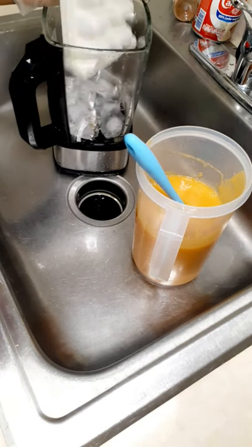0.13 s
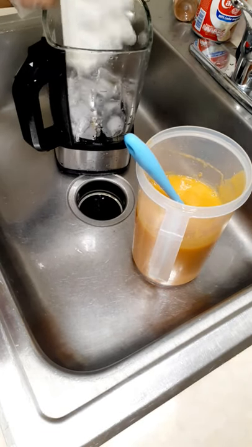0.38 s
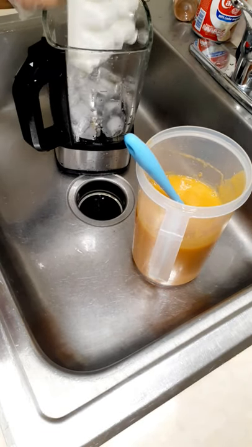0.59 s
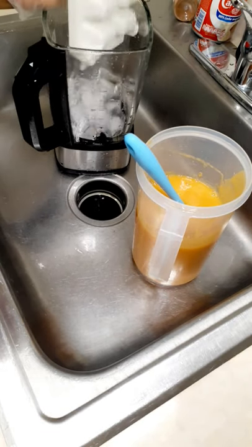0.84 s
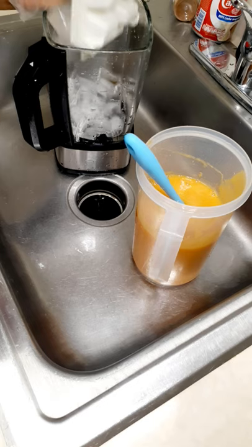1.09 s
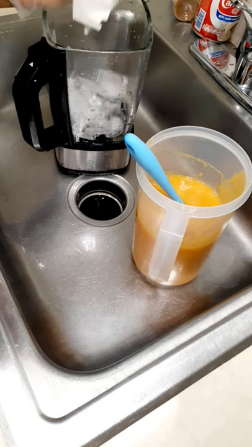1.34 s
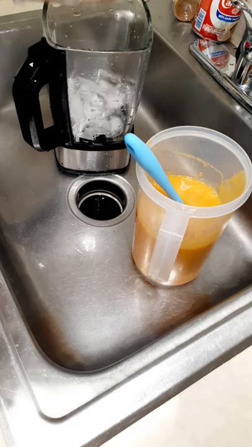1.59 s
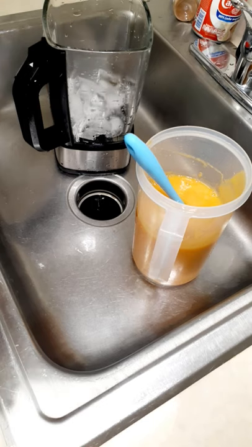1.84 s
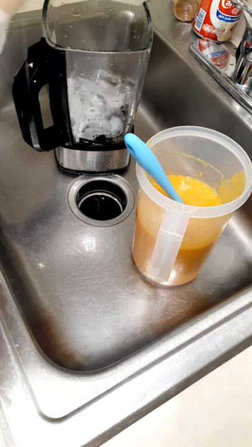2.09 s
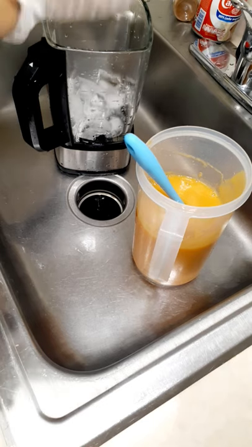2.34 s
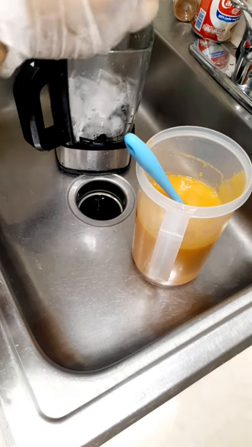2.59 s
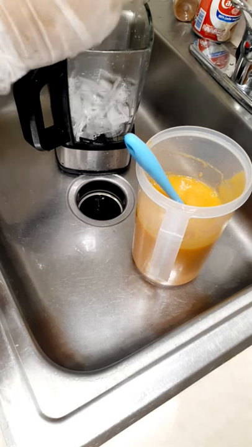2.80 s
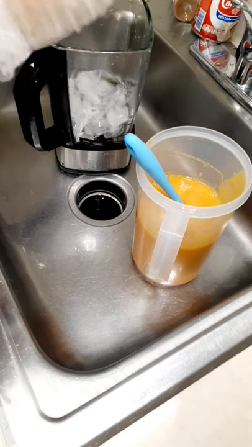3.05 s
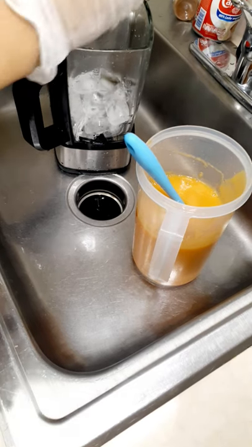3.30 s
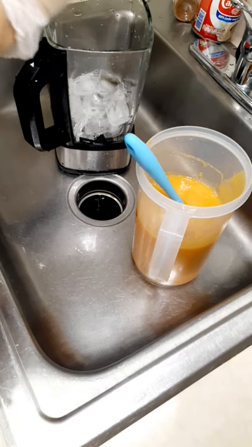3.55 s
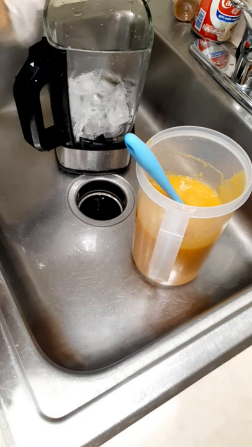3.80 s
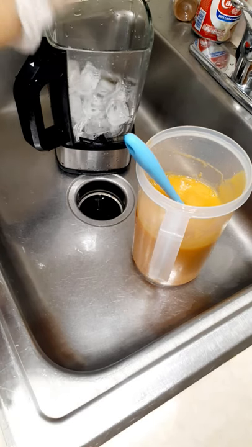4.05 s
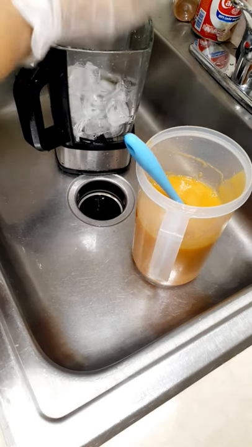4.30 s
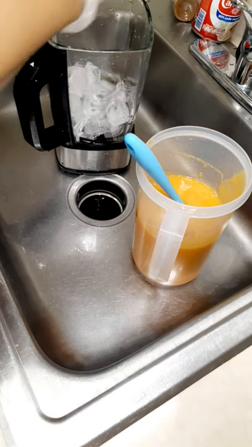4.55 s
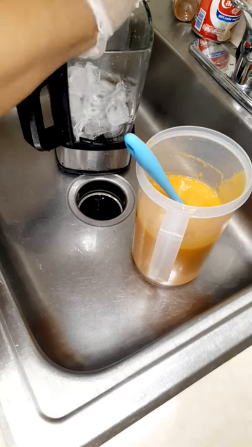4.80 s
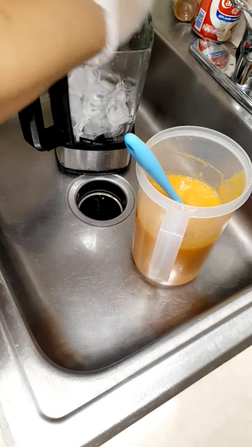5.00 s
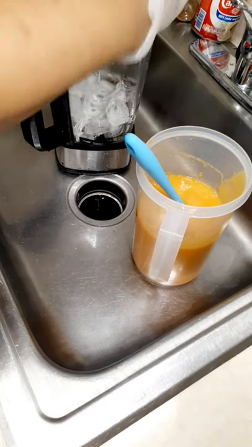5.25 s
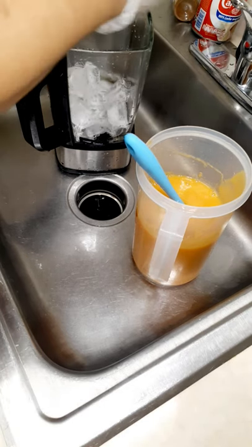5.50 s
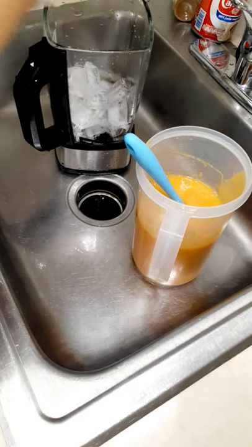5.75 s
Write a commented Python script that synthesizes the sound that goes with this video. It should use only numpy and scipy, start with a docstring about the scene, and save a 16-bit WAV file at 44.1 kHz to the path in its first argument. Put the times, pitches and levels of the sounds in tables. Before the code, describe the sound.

Close stereo capture in a home kitchen: ice cubes pour into a heavy glass jar standing in a steel sink, a dense clatter for about a second. Gloved hands then rustle and drop smaller batches, with gaps of soft shuffling, ending in two loud isolated cracks and near silence.

```python
"""Gloves rustle and ice shuffles; cubes are tipped from a tray, then dropped by a gloved hand, into a thick glass jar
standing in a steel sink. Each landing is a clack: noise chatter in a short resonance, with bright splintering. Damped
sines ring the glass and thump the basin, noise tails scatter into the kitchen and the heap settles in grains. Between
landings hands stir the ice in swells, down to a faint stillness. Two microphones a hand apart, the left one nearer."""
import sys
import numpy as np
from scipy import signal
from scipy.fft import rfft, irfft
from scipy.io import wavfile

SR = 44100
rng = np.random.default_rng(int(sys.argv[2]) if len(sys.argv) > 2 else 0)


def generate_wav(signal):
    """Clip the signal to [-1, 1] and save it as 16-bit WAV at the path in sys.argv[1]."""
    frames = np.transpose(np.atleast_2d(signal))
    scaled = np.clip(frames, -1, 1) * 32767
    pcm = np.round(scaled).astype(np.int16)
    wavfile.write(sys.argv[1], SR, pcm)


N = 259308   # samples in the scene


def from_db(db):
    """Level definition: 20 dB per factor of ten in amplitude."""
    return 10 ** (np.asarray(db) / 20)


def rms_one(x):
    """Energy normalisation: scales x to a root mean square of 1."""
    return x / np.sqrt(np.mean(x ** 2) + 1e-20)


def at_hz(points, hz, column):
    """Logarithmic pitch scale: reads a table column on a log-frequency axis."""
    points = np.array(points)
    return np.interp(np.log(hz), np.log(points[:, 0]), points[:, column])


def coloured(x, spectrum):
    """Spectral shaping: weights x by the spectrum, silent outside it, at rms 1."""
    hz = np.maximum(np.fft.rfftfreq(N, 1 / SR), 1)
    inside = (hz >= spectrum[0][0]) & (hz <= spectrum[-1][0])
    gain = from_db(at_hz(spectrum, hz, column=1)) * inside
    return rms_one(irfft(rfft(x) * gain, N))


def ring(clicks, hz, t60):
    """Damped resonance: a unit click starts a sine of height 1 that loses 60 dB in t60 seconds."""
    radius = from_db(-60 / (t60 * SR))
    w = 2 * np.pi * hz / SR
    return signal.lfilter([0, np.sin(w)], [1, -2 * radius * np.cos(w), radius * radius], clicks + 1e-18)


def struck(events, blow_db, hz, t60, spread_db):
    """Modal excitation: every event strikes one mode with a strength of its own."""
    clicks = np.zeros(N)
    strengths_db = blow_db + spread_db * rng.standard_normal(len(events))
    clicks[(np.array(events)[:, 0] * SR).astype(int)] = from_db(strengths_db)
    return ring(clicks, hz, t60)


RIGHT_LAG_S = 0.0002598


def microphones(x):
    """Interaural-style delay: the direct path reaches the right side later."""
    return np.array([x, np.roll(x, round(RIGHT_LAG_S * SR))])


def grains(spectrum, per_s, spread_db, alike):
    """Poisson-like impacts: random tiny clicks over a smooth bed, partly shared by the two sides."""
    happens = rng.random((3, N)) < per_s / SR
    sizes = from_db(spread_db * np.minimum(rng.exponential(1, (3, N)), 3)) * happens
    noise = rng.standard_normal((3, N)) * (0.47 + sizes)
    shared, left, right = [coloured(row, spectrum) for row in noise]
    alike = np.clip(alike, 0, 1)
    return np.sqrt(alike) * microphones(shared) + np.sqrt(1 - alike) * np.array([left, right])


def aftermath(s, db, rise_s, db_per_s):
    """Energy storage and decay: power that swells after each event and dies exponentially."""
    kicks, t = np.zeros(N), np.arange(SR) / SR
    kicks[(s * SR).astype(int)] = from_db(2 * db)   # twice the dB: power
    shape = (1 - np.exp(-t / rise_s)) ** 2 * from_db(-2 * db_per_s * t)
    return np.maximum(signal.fftconvolve(kicks, shape)[:N], 0)


# spectra of ice shuffle, glove rustle and basin rumble: f/Hz, relative spectral level/dB
SHUFFLE_SPECTRUM = [(290, -46), (500, -14.5), (618, -21.5), (687, -10.5), (817, -7.5), (1400, -6.5),
                    (1730, 4), (2450, 1.5), (5000, -34), (6500, -42.5), (11000, -120)]
RUSTLE_SPECTRUM = [(1760, -41.5), (3000, 2.5), (4940, 1.5), (6250, -3), (8620, -1), (15100, -3.5),
                   (16200, -12.5), (16500, -50)]
RUMBLE_SPECTRUM = [(21, -26.5), (35, -2), (108, 11.5), (173, -1), (312, 7.5), (360, 6.5), (410, 3.5),
                   (800, -9), (1040, -41.5), (1760, -120)]
# hand moves, each a swell: peak t/s, 20 dB rise t/s, 20 dB fall t/s, then shuffle, rustle, rumble level/dB
HANDS = [(0.001, 0.36, .13, -49, -57, -44.5), (0.225, 0.11, 0.1541, -46.5, -58.5, -50),
         (0.35, 0.0258, 0.2089, -31.5, -38.5, -45), (0.72, 0.2536, .25, -37.5, -45, -47.5),
         (0.87, 0.1081, 0.1106, -35, -47, -40), (1.09, 0.1047, .14, -35, -43, -40.5),
         (1.53, .045, .12, -62, -59, -75), (1.59, .07, .09, -60, -70, -82), (1.82, .08, .09, -57, -72, -46),
         (2.05, 0.1312, 0.1125, -41, -44.5, -47), (2.14, 0.0286, 0.1238, -43.5, -50, -51),
         (2.255, 0.0691, 0.099, -33, -44, -62), (2.38, 0.0574, 0.0707, -55.5, -45, -33),
         (2.63, 0.0066, 0.0943, -48, -46, -57.5), (2.7, 0.14, 0.0144, -40, -55, -56),
         (2.96, 0.11, 0.1231, -45.5, -55.5, -52.5), (3.315, 0.0379, 0.1361, -47, -50, -63),
         (3.55, 0.1223, 0.1049, -58, -65, -71), (3.627, 0.0464, 0.0718, -29, -38.5, -71),
         (4.01, .08, .08, -55, -56, -66), (4.18, .11, 0.146, -47, -48, -54),
         (4.359, 0.1857, 0.2072, -49, -48, -59.5), (4.56, .12, .35, -62, -65, -71),
         (4.72, .15, .07, -66, -73, -76), (4.83, .04, .15, -58, -51, -75),
         (4.885, .06, .15, -48, -51, -64.5), (4.99, 0.11, 0.15, -60, -51, -74),
         (5.16, .1, .09, -55, -54, -55), (5.41, 0.0965, .07, -54, -49, -62),
         (5.54, 0.1722, 0.1024, -55, -51, -69.5), (5.71, .12, .12, -68, -68, -79),
         (5.82, .06, .15, -76, -72, -68)]
# stillness: shuffle, rustle, rumble level/dB
STILLNESS = [-82, -86, -86]
SWELL_ROUNDNESS = 1.312   # power of the swell's flanks
# the heap settling: shuffle and fine crackle drive dB re the landing, swell time constant s, dying dB per s
SETTLE_DB, CRACKLE_DB, SETTLE_RISE_S, SETTLE_DB_PER_S = -20, -28, 0.03, 200
# the basin rumbling: drive dB re the blow to its modes near 110 Hz, swell time constant s, dying dB per s
RUMBLE_DB, RUMBLE_RISE_S, RUMBLE_DB_PER_S = -2.5, 0.037, 150


def movement():
    """Incoherent summation: powers of stirring, settling and basin shaking add to drive three grain noises."""
    t = np.arange(N) / SR
    power = from_db(2 * np.array(STILLNESS))[:, None] * np.ones(N)
    for s, rise_s, fall_s, *levels_db in HANDS:
        swell_db = -20 * (np.abs(t - s) / np.where(t < s, rise_s, fall_s)) ** SWELL_ROUNDNESS
        power += from_db(2 * np.add.outer(levels_db, swell_db))
    landing_s, landing_db = np.transpose(LANDINGS)[:2]
    settling = aftermath(landing_s, landing_db, SETTLE_RISE_S, SETTLE_DB_PER_S)
    power[:2] += from_db([[2 * SETTLE_DB], [2 * CRACKLE_DB]]) * settling
    thump_s, _, _, low_db, _ = np.transpose(THUMPS)
    power[2] += aftermath(thump_s, low_db + RUMBLE_DB, RUMBLE_RISE_S, RUMBLE_DB_PER_S)
    shuffle, rustle, rumble = np.sqrt(power)
    return (shuffle * grains(SHUFFLE_SPECTRUM, per_s=2700, spread_db=7.5, alike=0.21)
            + rustle * grains(RUSTLE_SPECTRUM, per_s=8500, spread_db=3.5, alike=0.11)
            + rumble * grains(RUMBLE_SPECTRUM, per_s=2500, spread_db=0.5, alike=0.85))


# landings: t/s, clack peak level/dB, clack f/Hz, splinter drive level/dB re that peak,
# crunch level/dB re the clack's resonance
LANDINGS = [(0.074, -26, 1300, -34, -11), (0.161, -19, 1000, -34, 1.5), (0.228, -29, 1190, -12.5, -0.5),
            (0.3, -8.5, 1050, -21, 4.5), (0.325, -14, 938, -14, 3), (0.338, -4, 1900, -16.5, -10),
            (0.36, -18, 1890, -15.5, -13), (0.398, -10.5, 1220, -13.5, 2), (0.475, -11.5, 1290, -8, 7),
            (0.541, -14, 1228, -16, -5), (0.549, -5, 1000, -26, 3), (0.569, -18.5, 880, -17.5, 0.5),
            (0.627, -21.5, 1190, -10, -3.5), (0.666, -5, 1295, -22, -2), (0.733, -16, 1140, -8, 0.5),
            (0.795, -7, 1330, -26, -3), (0.849, -20, 1670, -14.5, -4.5), (0.884, -5, 2380, -9.5, -5),
            (0.909, -6, 1213, -28, -7.5), (0.989, -5.5, 2720, -18.5, 0.5),
            (1.008, -19.5, 1220, -25.5, -1.5), (1.057, -19, 940, -9, 12), (1.07, -13.5, 950, -28.5, 0.5),
            (1.147, -24.5, 990, -15.5, 11.5), (1.221, -14, 1280, -11, 3.5), (1.365, -37, 3960, -22, -4),
            (1.472, -56, 3500, -6, 0), (1.713, -24, 1960, -16, -10), (1.727, -17.5, 1230, -19, -4.5),
            (1.909, -35.5, 900, -28, -6), (1.94, -40, 2100, -9.5, -1.5), (1.976, -32.5, 1900, -4, -1),
            (2.061, -21.5, 1882, -19, -2), (2.157, -22.5, 3050, -22, 5), (2.172, -3.5, 2250, -20, -3),
            (2.214, -23, 1930, -22, 1), (2.311, -9, 1980, -26.5, -4.5), (2.323, -7, 2470, -11, 3),
            (2.361, -23.5, 2165, -26, 1), (2.434, -6.5, 1300, -7.5, 5), (2.53, -19.5, 834, -16.5, 3.5),
            (2.591, -23, 2520, -15, -9.5), (2.658, -33.5, 2080, -9, -2.5), (2.687, -30.5, 1840, -15.5, -10),
            (2.812, -32, 2500, -12, 5), (2.818, -11, 1700, -6, 8), (2.85, -13.5, 1280, -14, 12),
            (3.01, -15.5, 1900, -21, 12), (3.235, -54.5, 784, -8, -2.5), (3.29, -41, 2230, -11.5, 5.5),
            (3.401, -40, 2160, -12.5, 0.5), (3.478, -46, 1700, -22, 3), (3.521, -28.5, 1550, -38.5, -7.5),
            (3.554, -27.5, 2280, -14.5, -4.5), (3.596, -24, 1540, -13, -5), (3.616, -23.5, 1830, -17, -15),
            (3.839, -13.5, 1250, -25, 12), (3.895, -21.5, 1260, -8, 1), (4.031, -32, 870, -15.5, 9),
            (4.067, -25.5, 2540, -34, 0), (4.088, -32, 800, -29.5, -6.5), (4.133, -28, 2450, -17, 0),
            (4.293, -27.5, 2570, -28, -10), (4.337, -32, 2510, -13, -5.5), (5.025, -6, 1814, -6.5, -15.5),
            (5.06, -26.5, 1980, -14.5, -2.5), (5.229, -1, 2300, -12.5, 2), (5.249, -14, 2580, 4, -0.5)]
CLACK_CYCLES = 16   # cycles until the clack's resonance has lost 60 dB
CHATTER_S = 0.0063   # time constant of the chatter in every clack


def clacks(splinter_s=0.01058, blow=36.0, first_touch=4.92, alike=0.071, reach=2.273):
    """Contact impact: a sharp touch and ms of chatter in a short resonance; splintering, unlike at each side."""
    knock, bright, t = np.zeros(N + 2048), np.zeros((3, N + 2048)), np.arange(2048) / SR
    treble = signal.butter(1, [4000, 9000], "band", fs=SR, output="sos")
    noise = rng.standard_normal((len(LANDINGS), 5, 2048))
    chatter = np.exp(-t / CHATTER_S) * (1 + first_touch * np.exp(-t / 0.00078))
    for (s, db, hz, treble_db, crunch_db), (push, broad, *fine) in zip(LANDINGS, noise):
        tone = ring(push * chatter + blow * (t == 0), hz, CLACK_CYCLES / hz)
        # a duller clack has a duller crunch around it
        body = signal.butter(2, [600, reach * hz], "band", fs=SR, output="sos")
        crunch = signal.sosfilt(body, broad * chatter)
        clack = rms_one(tone) + from_db(crunch_db) * rms_one(crunch)
        i = int(s * SR)
        knock[i:i + 2048] += from_db(db) * clack / np.max(np.abs(clack))
        # splinters come in uneven spurts of a millisecond or so
        spurts = from_db(3.5 * np.repeat(push[:32], 64))
        splinters = signal.sosfilt(treble, fine * spurts) * np.exp(-t / splinter_s)
        bright[:, i:i + 2048] += from_db(db + treble_db) * splinters
    alike = np.clip(alike, 0, 1)
    sides = np.sqrt(alike) * microphones(bright[0, :N]) + np.sqrt(1 - alike) * bright[1:, :N]
    return knock[:N], bright[0, :N], sides


# scatter by basin walls and kitchen: f/Hz, relative level/dB, 60 dB decay t/s, left-right likeness (0 to 1)
SCATTER = [(201, -5.5, 0.49, 1), (499, -7.5, 0.56, 0.994), (930, 6, 0.251, .6), (1900, 10, 0.1866, 0.13),
           (3680, 9.5, 0.243, 0.23), (7270, -0.5, 0.266, 0.13), (13900, 0, 0.17, 0.34)]
SCATTER_DB = 0   # whole tail


def scattered(x):
    """Diffuse reverberation: a dense stereo tail that builds in a few ms and dies band by band."""
    size = SR // 2
    t, tail = np.arange(size) / SR, np.zeros((2, size))
    edges = 60 * 2 ** np.arange(0, 8.6, .5)   # half octaves
    for low, high in zip(edges, np.minimum(edges[1:], .45 * SR)):
        band = signal.butter(2, [low, high], "band", fs=SR, output="sos")
        shared, left, right = signal.sosfilt(band, rng.standard_normal((3, size)))
        hz = np.sqrt(low * high)
        alike = np.clip(at_hz(SCATTER, hz, column=3), 0, 1)
        late = np.interp(t - RIGHT_LAG_S, t, shared)
        pair = np.sqrt(alike) * np.array([shared, late]) + np.sqrt(1 - alike) * np.array([left, right])
        decay_db = at_hz(SCATTER, hz, column=1) - 60 * t / at_hz(SCATTER, hz, column=2)
        tail += pair * from_db(decay_db)
    tail *= 1 - np.exp(-t / 0.0011)
    # energy of 1, averaged over the two sides
    tail /= np.sqrt(np.mean(np.sum(tail ** 2, axis=1)))
    return from_db(SCATTER_DB) * signal.fftconvolve(x[None], tail, axes=1)[:, :N]


def wobble(per_s):
    """Random modulation: straight lines between normal draws of spread 1, per_s draws a second."""
    steps = rng.standard_normal(int(N / SR * per_s) + 2)
    return np.interp(np.arange(N) / SR * per_s, np.arange(len(steps)), steps)


# modes of the glass jar: f/Hz, relative level/dB, 60 dB decay t/s
JAR_MODES = [(928, 0, .17), (1206, 2, .17), (1300, -12, .15), (1577, -11, .16), (1825, -16, .15),
             (1900, -15, .15), (2428, -4, .15), (2525, -4, .15), (2616, -2, .2), (3951, -8, .15),
             (4194, -2, .19), (4274, -2, .16), (4640, -12, .15), (5283, 4, .23), (5330, -3, .18),
             (6035, -3, .2), (6915, -4, .24), (7800, -9, .18), (8583, -9, .18), (9970, -10, .15),
             (11770, -14, .13)]
# cubes that strike the glass wall; where they strike sets which modes sound:
# t/s, drive level/dB near 1.2 kHz, then level/dB re that drive near 0.9 kHz, near 2.5 kHz, and upwards of 3.5 kHz
CLINKS = [(0.1614, -32.5, -3.5, -9, -27), (0.2984, -23.5, 3, -12.5, -14), (0.396, -24, -6.5, -13.5, -9),
          (0.474, -27.5, -15, 5.5, -8.5), (0.5477, -26.5, 0, -6, -15), (0.6638, -28.5, 2, 5.5, -19),
          (0.7304, -26, -10.5, -12, -14), (0.7949, -21, -7.5, -4, -22), (0.9074, -21, -8.5, -16, -16),
          (1.0573, -29, 1, -1, -11), (1.2217, -25, -17.5, -17.5, -9), (1.3656, -50.5, -5.5, -2.5, -15),
          (2.4324, -23, -8, -3, -5), (2.819, -20, -32, -9, -3), (2.85, -30.5, -24, 3.5, -2.5),
          (3.012, -50, 6, 10, 2), (3.8389, -21, -12, -6, -10), (3.894, -30, -17.5, -7.5, -8),
          (4.0686, -51.5, 9, 3.5, -9), (4.2941, -52.5, -4, 8, -3), (5.2484, -27, -6.5, 2, -3)]
# modes above 5 kHz re those near 4.2 kHz: dB at the start, dB gained per s as the jar fills
TOP_MODES_DB, TOP_DB_PER_S = -12, 2.4


def jar(wobble_db=4.0):
    """Modal superposition: glass modes take their region's strength and flutter as loose ice touches the wall."""
    s, db, low_db, middle_db, high_db = np.transpose(CLINKS)
    top_db = high_db + TOP_MODES_DB + TOP_DB_PER_S * s
    regions = [low_db, 0 * db, middle_db, high_db, top_db]
    edges_hz = [1000, 2000, 3500, 5000]
    rings = np.zeros(N)
    for hz, level_db, t60 in JAR_MODES:
        region_db = regions[np.searchsorted(edges_hz, hz)]
        mode = struck(CLINKS, db + level_db + region_db, hz, t60, spread_db=1.5)
        rings += mode * from_db(wobble_db * wobble(60))
    # a small jar radiates no bass
    return signal.sosfilt(signal.butter(2, 500, "high", fs=SR, output="sos"), rings)


# modes of the steel basin: f/Hz, relative level/dB, 60 dB decay t/s, 60 dB decay t/s of the resonance that feeds in
BASIN_MODES = [(49.3, 1, 0.75, 0.1), (91, -6.5, .25, 0.08), (118, 2, 0.21, 0.026), (233.3, -6.5, .2, 0.033),
               (294.36, -5, 0.34, 0.054), (317.97, 1.5, 0.2, 0.048), (378.4, -4.5, 0.15, .03),
               (387.7, -19, 0.18, .03), (423.8, -2.5, 0.2756, .03), (440.1, -13.5, 0.28, 0.033),
               (627.4, -5.5, 0.13, 0.03), (837.5, -6, 0.13, 0.03)]
# blows that reach the basin: t/s, drive level/dB near 430 Hz, then near 50 Hz, near 110 Hz and near 300 Hz
THUMPS = [(0.162, -36.5, -65.5, -55.5, -48), (0.303, -30, -56, -50.5, -43.5), (0.397, -33.5, -51, -57, -42),
          (0.475, -45, -64, -42.5, -46), (0.548, -28.5, -62, -54.5, -34), (0.666, -35.5, -55, -50, -33.5),
          (0.732, -43.5, -57, -49.5, -40), (0.797, -28.5, -65.5, -43.5, -34.5),
          (0.885, -30, -67, -49.5, -36.5), (0.91, -28.5, -66, -44.5, -34.5), (0.988, -33, -76, -44, -36),
          (1.057, -44.5, -55, -47.5, -42), (1.148, -44.5, -54.5, -44, -52.5), (1.218, -63, -53, -66.5, -42),
          (1.292, -43, -79.5, -59.5, -49.5), (1.725, -46.5, -64, -35, -34), (1.92, -53, -58, -49, -45.5),
          (1.974, -43, -60.5, -55, -61), (2.173, -32, -71.5, -62, -31), (2.312, -33.5, -51, -47.5, -32.5),
          (2.361, -39, -47, -41, -33), (2.43, -23.5, -40, -37.5, -27), (2.528, -28, -51, -44, -38.5),
          (2.814, -42.5, -60.5, -43.5, -40.5), (2.846, -29, -64.5, -39, -40),
          (2.945, -40, -61.5, -60.5, -55), (3.015, -36, -60, -49, -44), (3.234, -57.5, -86, -80, -66.5),
          (3.598, -45, -89, -80, -49.5), (3.844, -35, -45, -40, -40), (3.894, -38, -46, -54, -41),
          (4.032, -41, -72.5, -59.5, -46), (4.092, -33, -75.5, -63, -51), (4.133, -40, -77.5, -51.5, -47.5),
          (4.293, -65, -79, -66, -53), (5.024, -28, -36.5, -28.5, -26), (5.229, -22, -40, -32.5, -35),
          (5.299, -37.5, -47, -58, -44.5), (5.78, -79, -77, -55, -82), (5.81, -85, -75, -56, -85),
          (5.845, -89.5, -73.5, -58, -86)]
UPPER_STEEL_DB = 2   # modes above 500 Hz re those near 300 Hz


def basin():
    """Coupled resonance: the blow reaches the steel through the jar's foot, so each mode swells before it dies."""
    _, ring_db, deep_db, low_db, middle_db = np.transpose(THUMPS)
    regions = [deep_db, low_db, middle_db, ring_db, middle_db + UPPER_STEEL_DB]
    edges_hz = [70, 200, 390, 500]
    out = np.zeros(N)
    for hz, level_db, t60, rise in BASIN_MODES:
        region_db = regions[np.searchsorted(edges_hz, hz)]
        blows = struck(THUMPS, level_db + region_db, hz, t60, spread_db=1.5)
        # a second resonance at the same pitch makes the swell; the factor offsets its build-up
        out += ring(blows, hz, rise) * 2 * np.log(1000) / (rise * SR)
    return out


LEFT_DB = 2   # left above and right below the middle


def scene():
    """Linear superposition: direct, scattered and handling sounds add at two microphones."""
    (knock, bright, bright_sides), glass, steel = clacks(), jar(), basin()
    echoes = scattered(knock + 0.7 * bright + glass / 5 + 0.27 * steel)
    near = microphones(knock + glass + steel) + bright_sides + echoes + movement()
    return near * from_db([[LEFT_DB], [-LEFT_DB]])


def top_cut(x):
    """Nothing passes above the cut-off."""
    return signal.sosfilt(signal.butter(12, 16970, fs=SR, output="sos"), x)


def record(dry):
    """Band limiting and saturation: bass cut, top cut, then rounded peaks."""
    dry = signal.sosfilt(signal.butter(4, 40, "high", fs=SR, output="sos"), dry)
    dry = signal.sosfilt(signal.cheby2(10, 50, 16400, fs=SR, output="sos"), dry)
    mix = 1.1787 * np.tanh(dry / 1.2704)
    return top_cut(mix)


dry = scene()
out = record(dry)
generate_wav(out)
```